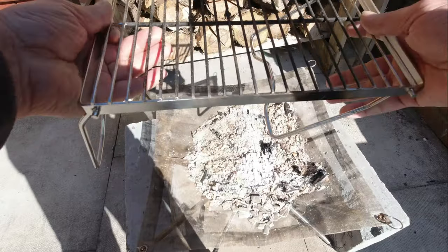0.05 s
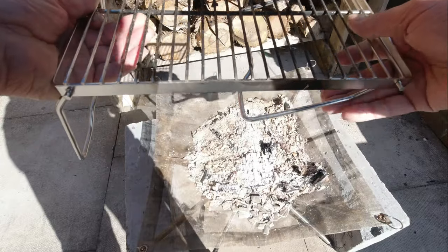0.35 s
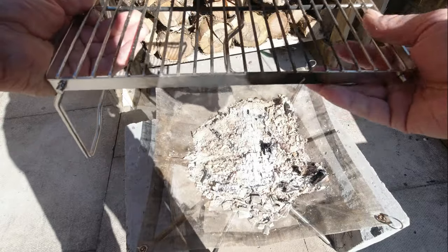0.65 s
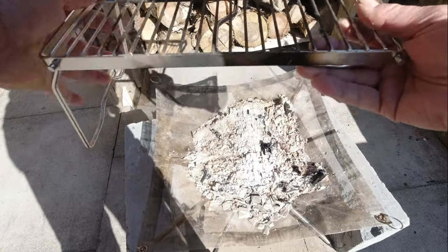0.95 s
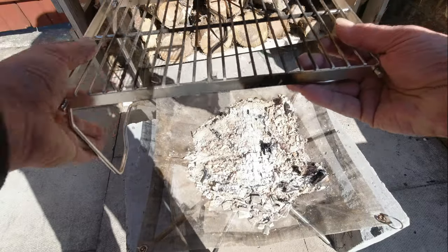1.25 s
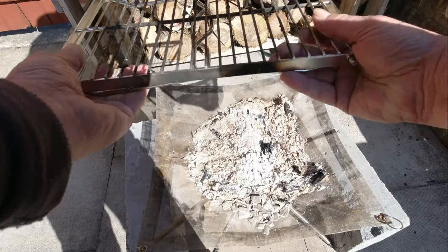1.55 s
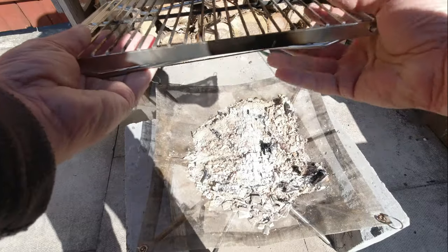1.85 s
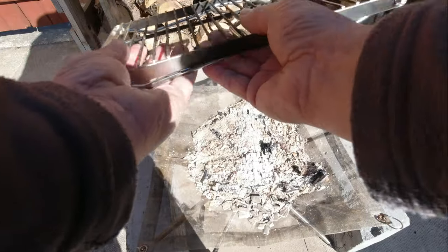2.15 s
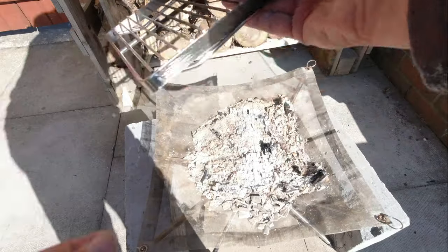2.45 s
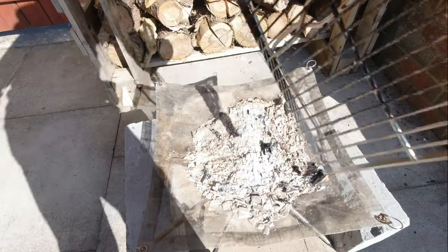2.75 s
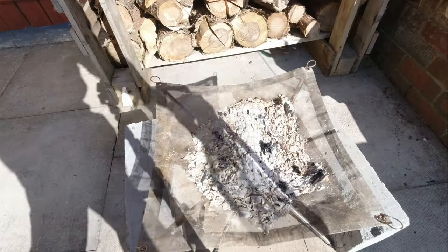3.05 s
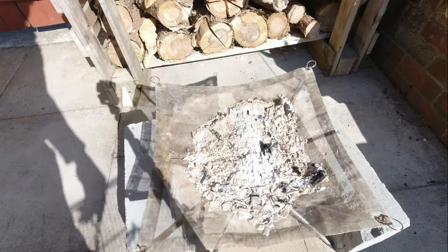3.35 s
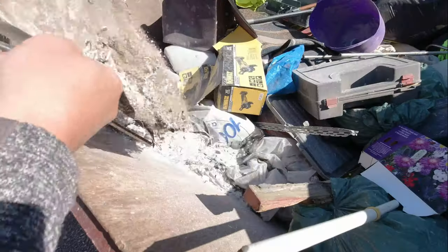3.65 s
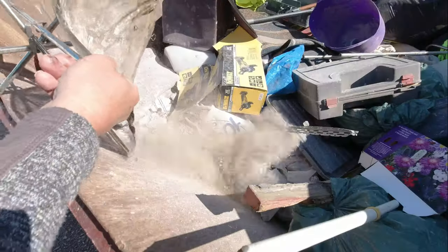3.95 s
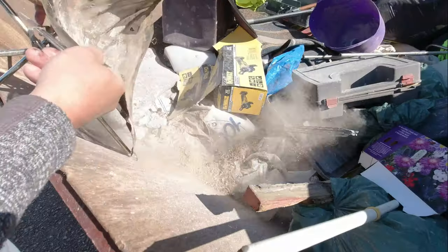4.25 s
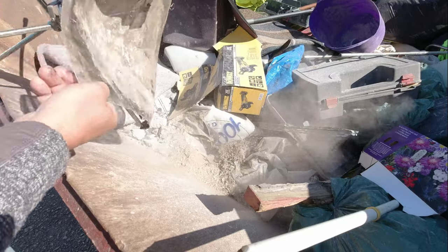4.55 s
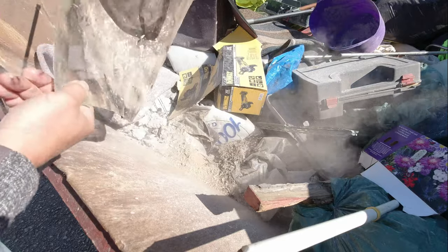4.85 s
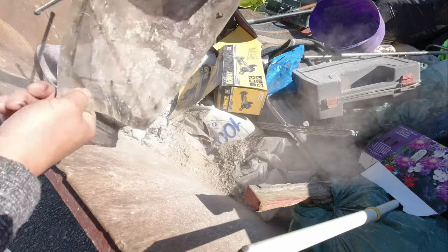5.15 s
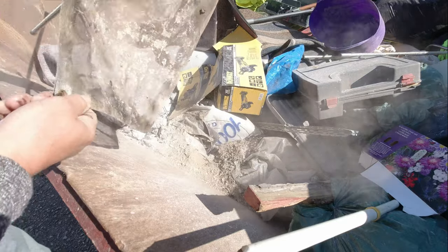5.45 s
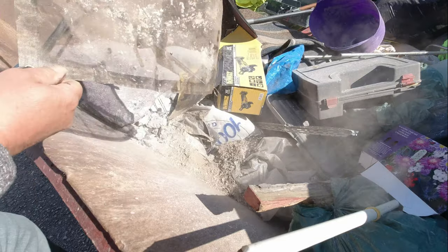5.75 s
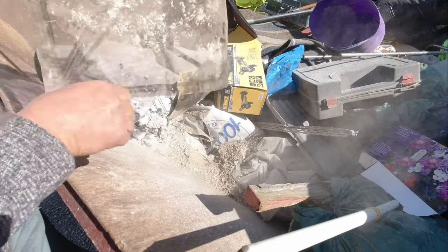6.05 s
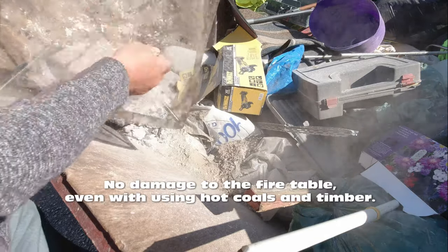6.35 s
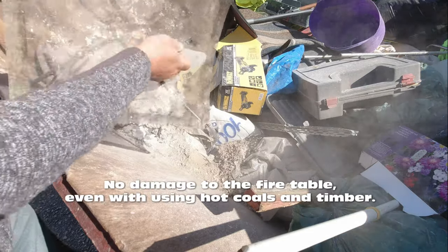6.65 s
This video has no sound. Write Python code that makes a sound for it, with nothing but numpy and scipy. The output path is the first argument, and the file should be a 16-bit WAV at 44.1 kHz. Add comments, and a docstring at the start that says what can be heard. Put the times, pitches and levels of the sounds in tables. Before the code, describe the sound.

Outdoors and close to the microphone, the wire legs of a steel grill rack snap against its bars with sharp clinks, a short buzz and a bright ring. Shoes scuff softly on paving. Then a mesh fire table knocks against a board with hollow thumps, and ash pours off in two slides, crunching and hissing with small clinking cinders. The mesh is shaken, rustling and ticking as the rest trickles away.

```python
"""Grill rack and pouring ash

On a patio the wire legs of a stainless grill rack are folded: they snap against the bars, buzz and
ring in their natural modes. Shoes scuff the paving. After a brief gap a steel-mesh fire table is
knocked against a board and tipped. Wood ash pours out in two slides, a stream of tiny impacts that
drum, crunch and hiss; the rest sifts off the mesh, which rustles and ticks as it is shaken."""
import sys
import numpy as np
from scipy import signal
from scipy.fft import rfft, irfft, next_fast_len
from scipy.io import wavfile
from scipy.ndimage import uniform_filter1d

SR = 44100
rng = np.random.default_rng(int(sys.argv[2]) if len(sys.argv) > 2 else 0)


def digitize_waveform(pressure):
    """Quantize a signal to 16-bit integers and store it at the path in sys.argv[1].

    Rows of a 2-D input are taken as channels; values are limited to [-1, 1].
    """
    field = np.atleast_2d(pressure).T
    bounded = np.clip(field, -1, 1)
    quanta = np.round(bounded * 32767).astype(np.int16)
    wavfile.write(sys.argv[1], SR, quanta)


N = 296352
T = np.arange(N) / SR

# a leg meets the rack: (time [s], clash [dB], buzz length [s], rack ring [dB], leg ring [dB])
LEG_SNAPS = [(0.059, -86, .004, -51.5, -42.5), (0.615, -21, 0.0065, -3, -1.5),
             (0.634, -31, .02, -20.5, -16), (0.657, -27, 0.007, -12, -3.5), (0.676, -30, 0.02, -16.5, -6),
             (0.7, -35.5, 0.024, -8, -28), (0.708, -35.5, 0.022, -8.5, -26), (0.909, -34, 0.01, -8, -18.5),
             (0.924, -31.5, 0.018, -11, -16.5), (1.612, -25.5, 0.004, -11.5, -19),
             (1.615, -23.5, .007, -29, -39), (1.637, -30.5, 0.026, -16, -34),
             (1.658, -30.5, .007, -45.5, -29)]
# knocks on steel: (time [s], level [dB], rattle length [s], ring [dB], treble tilt [dB/octave])
FRAME_KNOCKS = [(0.469, -43.5, 0.019, -32, -2.5), (2.425, -69, 0.0098, -64.5, -21),
                (2.533, -65, 0.0056, -68, -35), (2.795, -55.5, 0.0011, -40, -0.5),
                (3.513, -50, 0.038, -31, -3), (3.579, -29.5, 0.0063, -2, 13),
                (3.594, -31.5, 0.012, 1.5, -8), (3.677, -43, 0.0056, -23, -9.5),
                (3.854, -35.5, 0.0092, -21, -6), (4.174, -51.5, 0.0016, -53, 3),
                (4.247, -52, 0.0078, -37, 0.5), (4.304, -53, 0.0032, -36, 7),
                (4.328, -46.5, 0.0024, -45, -13.5), (4.432, -45, 0.0046, -31, -13),
                (4.479, -28.5, 0.0041, -7, -2), (4.527, -41, 0.019, -11, -7), (6.157, -51, 0.0091, -44, 5)]
# soft, heavy blows on the board: (time [s], level [dB])
BOARD_THUMPS = [(3.584, -5.5), (3.602, -2.5), (3.645, -11), (3.678, -13), (3.722, -18), (4.329, -30),
                (4.529, -19), (4.552, -7), (4.59, -14), (4.68, -22.5)]
# surges of sliding ash: (time of full flow [s], hold [s], drumming [dB], crunch [dB], hiss [dB])
ASH_SURGES = [(3.675, 0.011, -52, -48.5, -55.5), (3.794, 0.05, -38.5, -46, -46),
              (3.844, 0.17, -26.5, -33, -41), (4.064, 0.056, -35.5, -51.5, -56),
              (4.151, 0.048, -45.5, -52.5, -78), (4.284, 0.01, -59, -51, -59.5),
              (4.472, 0.056, -28.5, -50.5, -88), (4.555, 0.0091, -26, -45, -53.5)]
# large cinders hit steel or hollow rubble: (time [s], level [dB], frequency [Hz], T60 [s])
LARGE_CINDERS = [(3.651, -30.5, 1960, 0.01), (3.688, -32.5, 1970, 0.016), (3.772, -44, 2280, 0.075),
                 (3.85, -26.5, 655, 0.33), (3.873, -34, 2940, 0.057), (3.954, -31, 3700, 0.021),
                 (4.004, -35, 6100, 0.037), (4.075, -37.5, 660.7, 0.37), (4.096, -41, 3810, .025),
                 (4.177, -40.5, 2270, 0.028), (4.255, -46, 2650, 0.18), (4.31, -38.5, 2610, 0.04),
                 (4.561, -36, 3960, 0.023), (4.589, -40.5, 3920, 0.041), (4.696, -46, 1200, 0.039),
                 (4.832, -55.5, 3930, 0.15), (5.09, -42.5, 4880, 0.045), (6.062, -40.5, 3900, 0.032),
                 (6.473, -47.5, 3150, 0.037), (6.626, -44.5, 2160, 0.039)]
# shakes of the mesh: (time of full swing [s], hold [s], trickle [dB], rustle [dB], rod chatter [dB])
MESH_SHAKES = [(4.732, .01, -64, -100, -52.5), (4.838, 0.018, -64.5, -107, -58),
               (4.932, 0.037, -65, -76, -46.5), (5.015, 0.12, -54, -63.5, -47),
               (5.184, 0.043, -46, -46.5, -48), (5.354, 0.027, -42.5, -45.5, -42),
               (5.459, 0.054, -47, -54.5, -65), (5.535, 0.16, -45, -49, -50),
               (5.956, 0.11, -64.5, -57.5, -65), (6.148, 0.0091, -61, -88, -64),
               (6.397, 0.017, -57.5, -47.5, -40), (6.48, .03, -70, -87, -53),
               (6.572, 0.014, -63, -54.5, -44), (6.702, .02, -64, -55.5, -46)]
# ticks of cinders and mesh: (time [s], level [dB], length [s])
MESH_TICKS = [(3.826, -31, 0.0076), (3.886, -39, .005), (3.997, -27.5, 0.0062), (4.556, -32, 0.0034),
              (4.933, -49, 0.013), (4.966, -42, 0.0086), (5.089, -36, 0.0023), (5.17, -43, 0.0069),
              (5.316, -30.5, 0.0014), (5.337, -40, 0.0042), (5.368, -31.5, 0.0088), (5.422, -32.5, 0.0027),
              (5.972, -23.5, 0.0059), (6.049, -35.5, 0.0026), (6.391, -25, 0.0025), (6.563, -35.5, 0.0053),
              (6.694, -51, 0.0059)]
# the frame's legs drag over the board: (time [s], hold [s], level [dB])
FRAME_DRAGS = [(4.425, 0.059, -41), (4.485, 0.058, -31)]
# the background drops after the first loud snap and is back up after the gap: (time [s], level [dB])
BACKGROUND_LEVEL = [(0, -62), (.55, -61.5), (1.15, -71.5), (2.7, -70.5), (3.43, -65.5), (3.56, -61.5),
                    (6.72, -62.5)]

# bell-shaped swells: (time [s], level [dB], half length [s])
HINGE_TURNS = [(.03, -76.5, 0.057), (.37, -76, .06), (2.175, -60, .018), (2.225, -64.5, 0.023)]
SHOE_SCUFFS = [(2.062, -70, 0.015), (2.961, -45.5, 0.036), (3.117, -58, 0.012), (3.149, -45, 0.024),
               (3.198, -62.5, 0.052), (3.309, -61.5, 0.016), (3.338, -74, 0.031)]
AIR_PUFFS = [(.06, -60.5, .06), (.505, -46, 0.029), (3.64, -55, 0.085), (3.92, -58, .12)]

# natural modes of struck bodies: (frequency [Hz], level [dB], T60 [s])
RACK_MODES = [(899, -45, .28), (964, -52, .7), (1060, -54, 1.0), (1082, -56, .6), (1707, -50, .7),
              (1879, -47, .4), (2153, -49, .3), (2568, -57, .45), (2876, -51, .6), (2907, -51, .8),
              (2940, -53, .75), (3680, -44, .22), (4167, -45, .22), (4517, -44, .15), (4861, -42, .18),
              (5190, -56, .35), (5295, -51, .35), (5766, -56, .35), (6503, -44, .12), (8516, -47, .2),
              (9022, -45, .22), (9430, -40, .2), (9605, -35, .15), (9722, -36, .2), (9921, -40, .18),
              (10320, -35, .18), (10490, -43, .2), (11150, -40, .13), (11790, -45, .15), (12020, -42, .16),
              (12610, -44, .16), (13570, -47, .15)]
LEG_MODES = [(1879, -40, .4), (1911, -34, .22), (3456, -25.5, .19), (3545, -35, .16)]
FRAME_MODES = [(976, -38, 0.04), (1270, -27, 0.046), (1518, -27.5, 0.082), (1619, -31.5, 0.098),
               (1725, -44.5, 0.28), (1923, -24.5, 0.096), (2300, -42.5, 0.18)]
BOARD_MODES = [(70.3, -40.5, 0.46), (112.3, -33.5, 0.21), (148, -45, 0.31), (200.3, -25.5, 0.15),
               (238.8, -22, 0.18), (294.5, -34, 0.72), (342, -28, 0.13), (415, -35.5, 0.11)]

# resonances driven by many small contacts: (frequency [Hz], bandwidth [Hz], level [dB])
HEAP_RESONANCES = [(231, 18, -6.5), (330, 33.7, 0), (409, 39, -3), (505.6, 60, -10), (660.4, 16, 3.5),
                   (775, 130, -17), (959, 24, -7), (1170, 31, -37)]
DRAG_RESONANCES = [(657, 30, -3), (985, 24, 3), (1210, 22, -9), (1600, 36, -3), (1840, 60, -11),
                   (2340, 30, -4), (2620, 40, -7), (3040, 50, -15), (3360, 50, -19)]
ROD_RESONANCES = [(1600, 80, -10), (2100, 70, -3), (2750, 40, -4), (3060, 50, 3), (3880, 55, 1),
                  (4010, 60, 1), (4430, 34, -7), (4780, 55, -6), (5910, 80, -12), (6090, 55, -13),
                  (6610, 55, -13), (7550, 70, -11)]
HINGE_RESONANCES = [(2600, 31, -9), (3620, 47, -3.5), (4080, 52, -2.5), (5260, 70, -9.5), (6160, 120, -9.5),
                    (9540, 84, -3.5)]

# spectral densities: (frequency [Hz], relative level [dB])
CLASH_SPECTRUM = [(60, -29.5), (190, -6), (300, -17.5), (520, -18.5), (950, -9), (1300, -11.5), (2000, -6),
                  (3600, 1.5), (5000, -1.5), (7600, -5), (9700, 8.5), (12000, 3), (15000, -2),
                  (16500, -25.5)]  # crowded, short-lived wire modes
KNOCK_SPECTRUM = [(80, -22), (220, 1.5), (480, -5.5), (900, 4), (1700, 9.5), (2800, 5.5), (3800, 5.5),
                  (5500, -10), (7300, -21), (9800, -27), (12000, -56.5), (16000, -46)]
CRUNCH_SPECTRUM = [(60, 9.5), (150, 14.5), (500, 0.5), (1200, 8.5), (1700, 3), (2200, 2), (3700, 6),
                   (5000, -4), (8000, -36), (16000, -43)]
POWDER_SPECTRUM = [(1500, -11), (4000, 10), (6000, 7.5), (7500, 6.5), (9500, 17.5), (11500, 5), (14500, -7),
                   (16500, -12)]
TRICKLE_SPECTRUM = [(88, -27), (150, -7.5), (270, -7.5), (420, 1.5), (540, 4), (758, -3), (885, 2.5),
                    (1190, -4.5), (1690, 3.5), (3000, -3.5), (3500, -2.5), (6000, -14.5), (7800, -22.5),
                    (13200, -120)]
MESH_SPECTRUM = [(900, -38), (2100, 7), (2700, 9), (3900, 15), (5000, -5), (7200, 1), (9600, 9.5),
                 (11500, 1), (12800, -13), (14200, -10.5), (16000, -47)]
SOLE_SPECTRUM = [(120, -24), (200, -13), (407, -14), (677, -4), (940, -6.5), (1480, -1), (2330, -7),
                 (3890, -6.5), (6960, -16.5), (9140, -8.5), (13600, -24), (14700, -41), (15500, -57)]
RUMBLE_SPECTRUM = [(10, -1.5), (25, 4.5), (60, 1), (90, -14), (140, -18), (300, -41)]
HUSH_SPECTRUM = [(59, -20), (100, 3), (167, -5), (204, -3), (237, -5), (355, -3), (458, -10), (608, -5.5),
                 (2500, -24), (3250, -60.5), (5500, -120)]
FAINT_RUSTLE_SPECTRUM = [(700, -17), (1600, -3.5), (2600, 3.5), (3900, 3.5), (5000, -4), (7500, -9.5),
                         (9600, -12.5), (11500, -26.5), (16000, -31.5)]

# likeness of the two channels: (frequency [Hz], left-right correlation [-1 to 1])
SCATTERED_FIELD = [(150, 0.97), (500, 0.96), (1000, 0.87), (2000, .35), (3700, 0.28), (6000, -0.45),
                   (9500, -0.19), (14000, -0.22)]
DIRECT_FIELD = [(100, 1), (500, 0.96), (1500, 0.93), (3500, 0.66), (7000, 0.9), (14000, 0.067)]  # sound from one side
LEG_FIELD = [(1900, -0.068), (3500, -0.19)]

# envelope slopes: (rise [dB/s], sag while held [dB/s], fall [dB/s])
DRUM_SLOPES, CRUNCH_SLOPES, HISS_SLOPES = (300, 61, 210), (220, 34, 138), (720, 7.5, 257)
TRICKLE_SLOPES, RUSTLE_SLOPES = (190, 8.9, 150), (600, 51, 260)
CHATTER_SLOPES, DRAG_SLOPES = (1300, 23, 57), (770, 24, 660)

GRIP_S, GRIP_LOSS_DB, GRIP_BELOW_HZ = 1.046, 7.5, 2700  # fingers close on the rack
STRAYS_PER_S, STRAY_OVER_CRUNCH_DB, STRAY_RANGE_HZ, STRAY_T60_S = 19, 3.5, (1233, 4200), 0.041
COLOUR_CYCLES_PER_S = 2.2
GAP_START_S, GAP_END_S = 3.444, 3.503
CUTOFF_HZ = 15500


def grill_rack():
    """Free vibration: each snap buzzes and sets rack and leg ringing; a grip mutes low rack modes."""
    out = np.zeros((2, N))
    low = [mode for mode in RACK_MODES if mode[0] < GRIP_BELOW_HZ]
    high = [mode for mode in RACK_MODES if mode[0] >= GRIP_BELOW_HZ]
    for s, db, buzz, rack_db, leg_db in LEG_SNAPS:
        gripped = np.clip((s + T[:SR] - GRIP_S) / 0.009, 0, 1) * (s < GRIP_S)
        rack = from_db(-GRIP_LOSS_DB * gripped) * ringing(low) + ringing(high)
        clash = impact(CLASH_SPECTRUM, buzz, t60=0.071, tail_db=-12.5, tail_t60=0.14,
                       crack_db=4.5, ripple_db=5)
        add(out, s, from_db(db) * clash)
        add(out, s, from_db(rack_db) * rack + from_db(leg_db) * ringing(LEG_MODES, LEG_FIELD))
    return out


def knocks():
    """Impulse response: hand-damped steel rings briefly; the board booms under heavy blows."""
    out, frame, board = np.zeros((2, N)), ringing(FRAME_MODES), ringing(BOARD_MODES)
    for s, db, rattle, ring_db, tilt_db in FRAME_KNOCKS:
        knock = impact(KNOCK_SPECTRUM, rattle, t60=0.08, tail_db=-12.5, tail_t60=0.22,
                       crack_db=-4, ripple_db=7, tilt_db=tilt_db)
        add(out, s, from_db(db) * knock)
        add(out, s, from_db(ring_db) * frame)
    for s, db in BOARD_THUMPS:
        add(out, s, from_db(db) * board)
    return out


def pouring_ash():
    """Granular flow: lumps drum on the hollow heap, cinders crunch and clink, powder hisses."""
    s, hold, drum_db, crunch_db, hiss_db = np.transpose(ASH_SURGES)
    drumming = driven(strokes(s, hold, drum_db, DRUM_SLOPES), HEAP_RESONANCES, per_s=1200, spread_db=2)
    crunch_level = strokes(s, hold, crunch_db, CRUNCH_SLOPES)
    crunch = colour(grains(per_s=1100, spread_db=2), CRUNCH_SPECTRUM, DIRECT_FIELD,
                    lead_ms=0.058, ripple_db=3.5)
    hiss_level = strokes(s, hold, hiss_db, HISS_SLOPES)
    hiss = colour(grains(per_s=2900, spread_db=-1), POWDER_SPECTRUM, ripple_db=4.5)
    out = from_db(-6) * drumming + from_db(-5.5) * crunch_level * crunch
    out += from_db(-3.5) * hiss_level * hiss
    for s, db, hz, t60 in LARGE_CINDERS + stray_cinders(crunch_level):
        # one clear mode among rough neighbours
        neighbours = [(hz / 3, -30), (hz * 0.54, -8), (hz, 0), (hz * 1.19, -8), (hz * 3, -36)]
        clink = impact(neighbours, 0.00047, t60, tail_db=-30, tail_t60=.08, crack_db=17, ripple_db=9)
        add(out, s, from_db(db - 5.5) * clink)
        add(out, s, ringing([(hz, db, t60)]))
    return out


def stray_cinders(crunch_level):
    """Random arrivals: small cinders of scattered pitch, as strong as the flow that carries them."""
    first, last = ASH_SURGES[0][0], ASH_SURGES[-1][0]
    low, high = STRAY_RANGE_HZ
    gap, pitch = rng.random((40, 2)).T
    times = first + np.cumsum(2 * gap / STRAYS_PER_S)
    return [(s, STRAY_OVER_CRUNCH_DB + 20 * np.log10(crunch_level[int(s * SR)]), hz, STRAY_T60_S)
            for s, hz in zip(times, low * (high / low) ** pitch) if s < last]


def shaken_mesh():
    """Friction and small impacts: ash trickles off on the left while woven steel rubs and ticks."""
    s, hold, ash_db, rub_db, _ = np.transpose(MESH_SHAKES)
    ash = shifting([colour(grains(per_s=2500, spread_db=0.5), TRICKLE_SPECTRUM, DIRECT_FIELD,
                           lead_ms=.16, ripple_db=3.5) for _ in range(3)])
    rub = shifting([colour(grains(per_s=3800, spread_db=0), MESH_SPECTRUM, DIRECT_FIELD,
                           lead_ms=0.13, ripple_db=4.5) for _ in range(3)])
    out = strokes(s, hold, ash_db, TRICKLE_SLOPES) * ash + strokes(s, hold, rub_db, RUSTLE_SLOPES) * rub
    for s, db, length in MESH_TICKS:
        tick = impact(MESH_SPECTRUM, length, t60=0.0051, tail_db=-37, tail_t60=0.096,
                      crack_db=-12, ripple_db=8, tilt_db=10)
        add(out, s, from_db(db - 11) * tick)
    return out


def shifting(sounds):
    """Constant-power crossfade: random colourings take turns, so the timbre keeps changing."""
    turn = 2 * np.pi * (COLOUR_CYCLES_PER_S * T + np.arange(len(sounds))[:, None] / len(sounds))
    weights = np.maximum(np.cos(turn), 0)
    return sum(w * sound for w, sound in zip(weights, sounds)) / np.sqrt(np.sum(weights ** 2, axis=0))


def frame_rubs():
    """Contact excitation: the frame judders over the board, then its rods chatter in their sockets."""
    s, hold, _, _, rods_db = np.transpose(MESH_SHAKES)
    drag_level = strokes(*np.transpose(FRAME_DRAGS), DRAG_SLOPES)
    judder = driven(drag_level, DRAG_RESONANCES, per_s=790, spread_db=0.5)
    shake_level = strokes(s, hold, rods_db, CHATTER_SLOPES)
    chatter = driven(shake_level, ROD_RESONANCES, per_s=90, spread_db=2,
                     field=DIRECT_FIELD, lead_ms=0.071)
    return from_db(-3) * judder + from_db(-16) * chatter


def hinges():
    """Stick-slip friction: wire catches and slides in its socket as a leg is swung."""
    return driven(swells(HINGE_TURNS), HINGE_RESONANCES, per_s=1300, spread_db=2)


def shoes():
    """Rolling contact: grit under a sole makes dense clicks that swell and ease off."""
    return swells(SHOE_SCUFFS) * colour(grains(per_s=17000, spread_db=0), SOLE_SPECTRUM)


def open_air():
    """Ambient noise: a low air rumble with a few puffs, a distant hush and a faint rustle."""
    level = from_db(np.interp(T, *np.transpose(BACKGROUND_LEVEL)))
    rumble = (from_db(0.5) * level + swells(AIR_PUFFS)) * colour(white(), RUMBLE_SPECTRUM)
    hush = from_db(-4.5) * level * colour(white(), HUSH_SPECTRUM)
    rustle = from_db(-16) * level * colour(grains(per_s=11000, spread_db=-1), FAINT_RUSTLE_SPECTRUM)
    return rumble + hush + rustle


def impact(spectrum, length, t60, tail_db, tail_t60, crack_db, ripple_db, tilt_db=0):
    """Rebound: a crack, chatter while the parts bounce, then dense modes and reflections decay."""
    t = T[:SR // 2]
    after = np.maximum(t - length, 0)
    decay = from_db(-60 * after / t60) + from_db(tail_db - 60 * after / tail_t60)
    bounces = (rng.random(len(t)) < 500 / SR) * (t < length) * rng.random(len(t))
    bounces[0] = 1
    cracks = signal.lfilter([1], [1, -np.exp(-1 / (.0005 * SR))], bounces)
    force = (decay + from_db(crack_db) * cracks) / (1 + from_db(crack_db) / 2)
    return rms(force) * colour(white(len(t)) * force, spectrum, tilt_db=tilt_db, ripple_db=ripple_db)


def ringing(modes, field=SCATTERED_FIELD):
    """Modal superposition: damped sines build up within a cycle and reach the two sides out of step."""
    out = np.zeros((2, SR))
    for k, (hz, db, t60) in enumerate(modes):
        t = T[:min(SR, int(2 * t60 * SR))]
        phase_split = np.arccos(np.clip(at_hz(field, hz), -1, 1)) * np.array([[.5], [-.5]]) * (-1) ** k
        envelope = (1 - np.exp(-(2 * hz * t) ** 2)) * from_db(db - 60 * t / t60)
        out[:, :len(t)] += envelope * np.sin(2 * np.pi * (hz * t + rng.random()) + phase_split)
    return out


def driven(level, resonances, per_s, spread_db, field=SCATTERED_FIELD, lead_ms=0):
    """Forced vibration: a stream of small contacts, following this level, sets resonances ringing."""
    contacts = level * colour(grains(per_s, spread_db), [(100, 0), (16000, 0)], field, lead_ms)
    body = 0
    for k, (hz, width, db) in enumerate(resonances):
        resonator = signal.iirpeak(hz, hz / width, fs=SR)
        body += (-1) ** k * from_db(db) * signal.lfilter(*resonator, contacts + 1e-18)
    return body / rms(body) * rms(level)


def colour(pair, spectrum, field=SCATTERED_FIELD, lead_ms=0, tilt_db=0, ripple_db=0):
    """Source and filter: a white pair becomes stereo of rms 1, rippled by crowded resonances."""
    size = next_fast_len(pair.shape[-1])
    hz = np.fft.rfftfreq(size, 1 / SR)
    coarse_hz = np.linspace(0, SR / 2, 400)
    mid, diffuse = rfft(pair, size)
    # from the side come mostly near reflections, each frequency a little late
    phase_lag = np.interp(hz, coarse_hz, np.cumsum(rng.exponential(.35, len(coarse_hz))))
    side = .85 * mid * np.exp(-1j * phase_lag) + .53 * diffuse
    correlation = np.clip(at_hz(field, hz), -1, 1)
    stereo = np.sqrt(1 + correlation) * mid + np.sqrt(1 - correlation) * side * [[1], [-1]]
    stereo[1] *= np.exp(-2j * np.pi * hz * lead_ms / 1000)  # the left side leads
    octaves_past_top = np.log2(np.maximum(hz / spectrum[-1][0], 1))
    octaves = np.log2(np.maximum(hz, 500) / 2000)
    ripple = np.interp(hz, coarse_hz, rng.standard_normal(len(coarse_hz)))
    gain = from_db(at_hz(spectrum, hz) + tilt_db * octaves - 20 * octaves_past_top + ripple_db * ripple)
    cepstrum = irfft(np.log(gain), size)[:size // 2]
    causal = np.exp(rfft(2 * cepstrum, size) - cepstrum[0])  # minimum phase: nothing rings early
    sound = irfft(stereo * causal, size)[:, :pair.shape[-1]]
    return sound / rms(sound)


def grains(per_s, spread_db):
    """Shot noise: two trains of clicks at random times and of random sizes."""
    sizes = from_db(spread_db * np.minimum(rng.exponential(1, N), 5))
    return white() * sizes * (rng.random(N) < per_s / SR)


def strokes(times, holds, levels_db, slopes):
    """Incoherent summation: each movement's gain rises, sags while held and falls; the powers add."""
    rise, sag, fall = slopes
    power = 0
    for s, hold, db in zip(times, holds, levels_db):
        loss_db = (rise * np.maximum(s - T, 0) + sag * np.clip(T - s, 0, hold)
                   + fall * np.maximum(T - s - hold, 0))
        power += from_db(db - np.minimum(loss_db, 150)) ** 2
    return np.sqrt(power)


def swells(rows):
    """Gaussian envelopes: the gain over time of smooth pushes."""
    return sum(from_db(db) * np.exp(-np.minimum(((T - s) / half) ** 2, 20)) for s, db, half in rows)


def white(size=N):
    """White noise in two independent channels."""
    return rng.standard_normal((2, size))


def add(out, s, sound):
    """Superposition: mix a sound in at time s, fading its far end."""
    start = int(s * SR)
    fade = np.clip(np.linspace(4, -1, sound.shape[-1]), 0, 1)
    out[:, start:start + len(fade)] += (sound * fade)[:, :N - start]


def at_hz(points, hz):
    """Interpolation on a log-frequency axis."""
    table_hz, value = np.transpose(points)
    return np.interp(np.log(hz + 1), np.log(table_hz), value)


def from_db(db):
    """Decibels to amplitude ratio."""
    return 10 ** (np.asarray(db) / 20)


def rms(x):
    """Root-mean-square amplitude, kept above zero."""
    return np.sqrt(np.mean(x ** 2) + 1e-20)


def scene():
    """Superposition of all sources; the sound drops out briefly between patio and ash heap."""
    gap = (T > GAP_START_S) & (T < GAP_END_S)
    gate = np.maximum(1 - uniform_filter1d(gap.astype(float), size=128), from_db(-55.5))
    patio = grill_rack() + hinges() + shoes()
    heap = pouring_ash() + frame_rubs() + shaken_mesh()
    return (patio + knocks() + heap + open_air()) * gate


def record(dry):
    """Band limiting: an elliptic low-pass filter cuts the highest treble steeply."""
    return signal.sosfilt(signal.ellip(10, .2, 80, CUTOFF_HZ, fs=SR, output="sos"), dry)


dry = scene()
out = record(dry)
digitize_waveform(out)
```